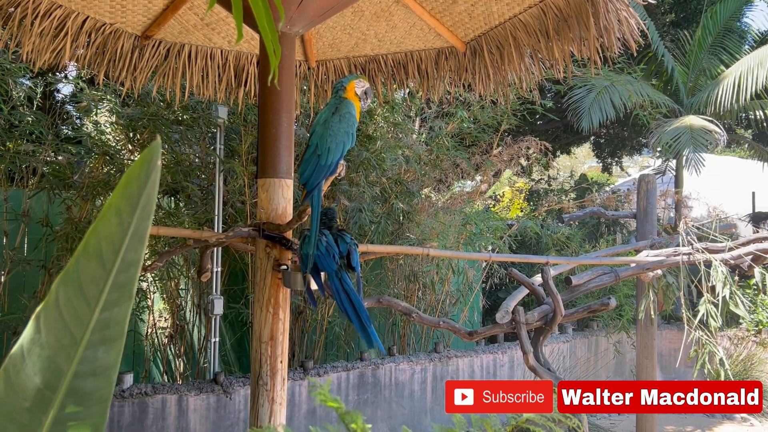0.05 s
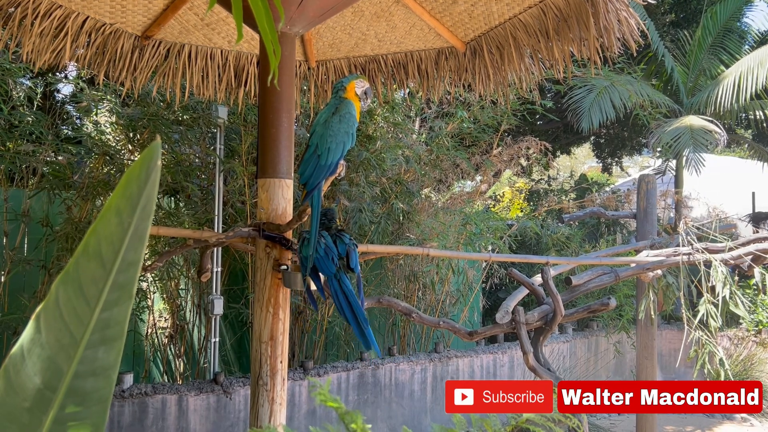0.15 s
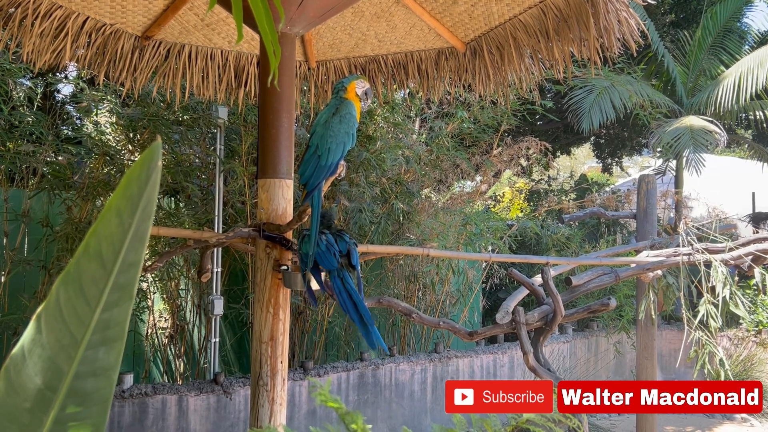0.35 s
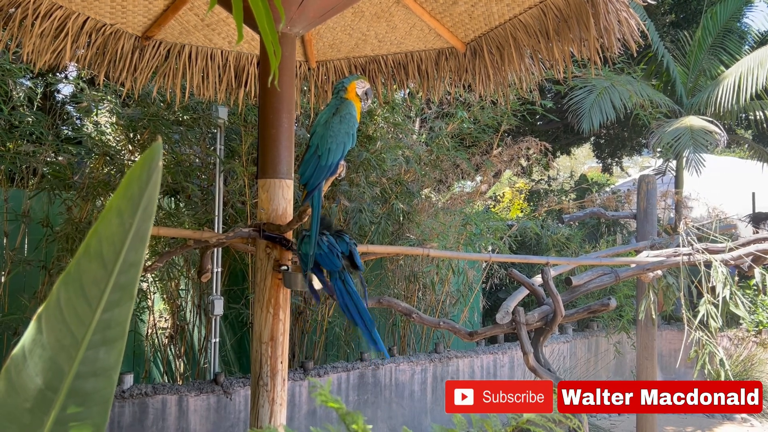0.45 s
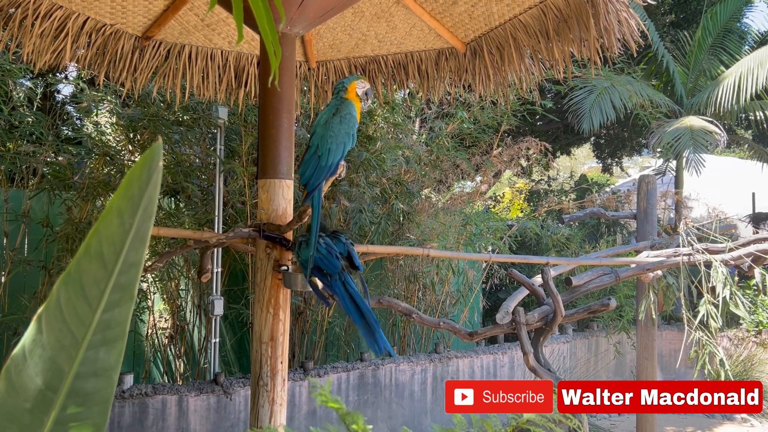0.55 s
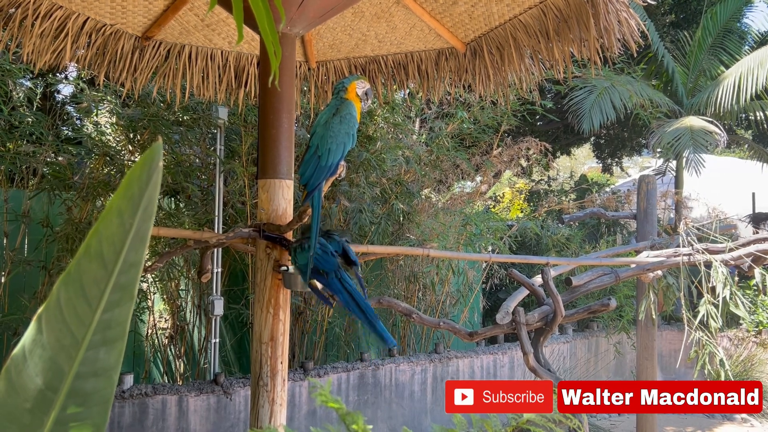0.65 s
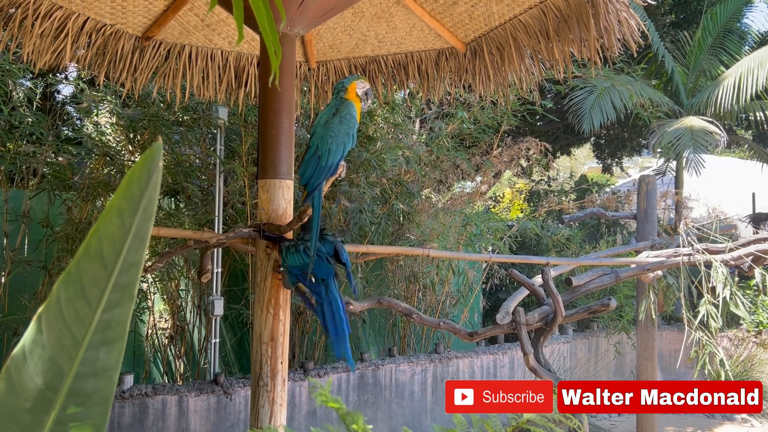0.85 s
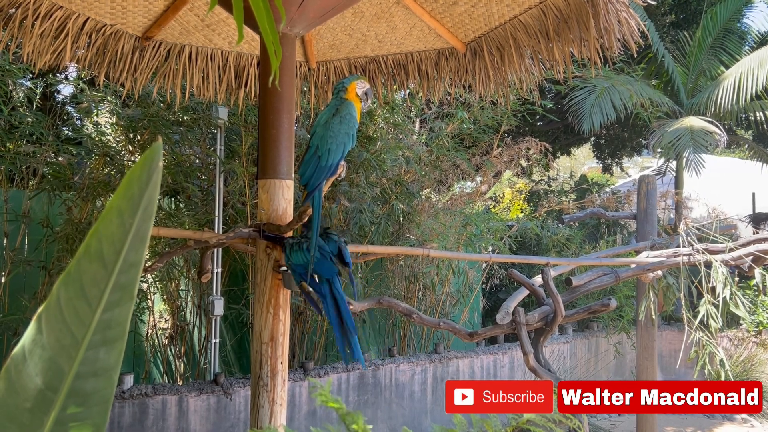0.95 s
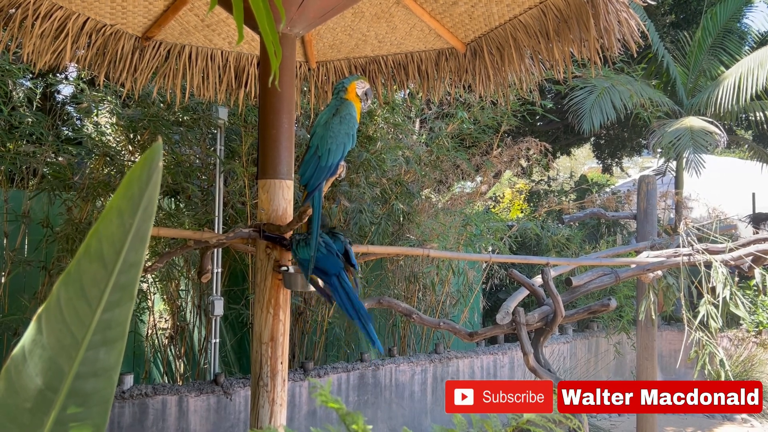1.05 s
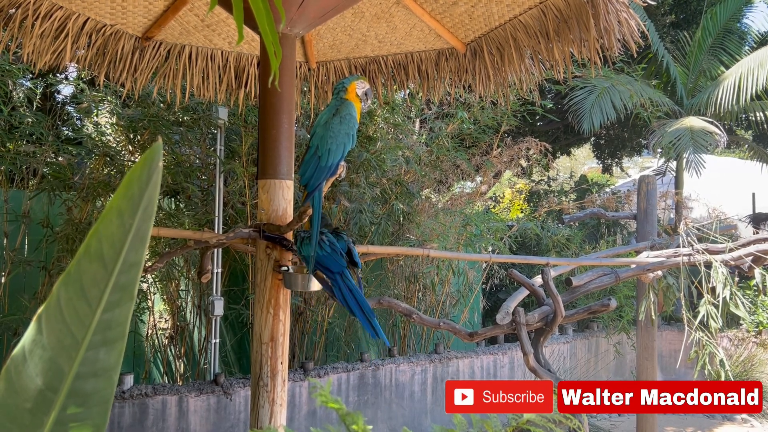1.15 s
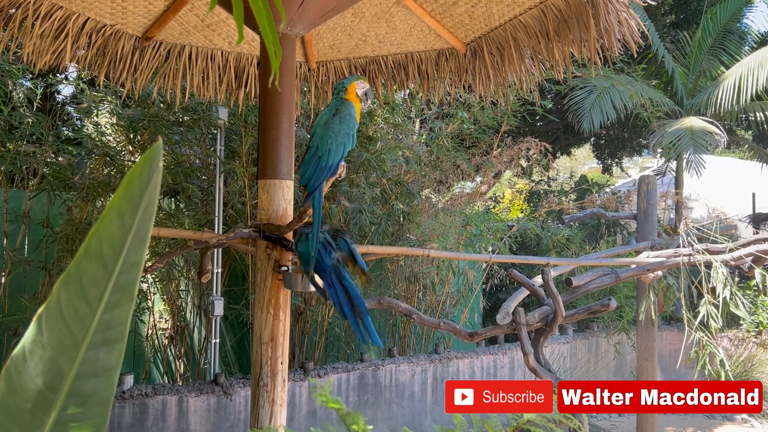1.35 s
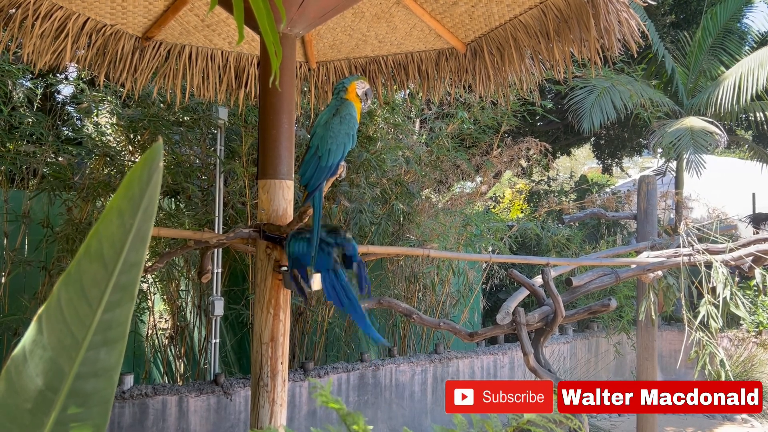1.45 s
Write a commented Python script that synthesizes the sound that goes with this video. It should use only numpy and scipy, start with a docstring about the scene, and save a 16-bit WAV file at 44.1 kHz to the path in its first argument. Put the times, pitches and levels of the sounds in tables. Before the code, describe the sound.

A large parrot gives two harsh calls close by, first a squealing scream that falls away, then a hoarse rasp ending on a nasal tone. Behind it are soft outdoor air and a very faint, distant twitter.

```python
"""A macaw squawks twice, close by, under a thatched shelter in a garden.
The first call leaps up in a squeal, bursts into a scream and falls away; the second is a rattling rasp
that clears to a nasal tone. Its voice box makes pulses that ring in the throat and beak, and the voice
slips some forty times a second, which makes the rasp. The shelter and the garden echo, a small bird
twitters far off over a quiet outdoor wash, and the microphone adds grit to the loudest peaks."""
import sys
import numpy as np
from scipy import signal
from scipy.fft import rfft, irfft
from scipy.io import wavfile
from scipy.ndimage import uniform_filter1d, map_coordinates

SR = 44100
rng = np.random.default_rng(int(sys.argv[2]) if len(sys.argv) > 2 else 0)


def to_wav(sig):
    """Store sig (one row per channel, or 1-D mono) as 16-bit WAV at the path in sys.argv[1].

    Samples outside -1..1 are clipped; the rate is SR.
    """
    pcm = np.clip(np.atleast_2d(sig), -1, 1) * 32767
    pcm = np.round(pcm).astype(np.int16)
    wavfile.write(sys.argv[1], SR, pcm.T)  # frames by channels


N = 66150  # 1.5 seconds

# tone colour of the outdoor wash (frequency [Hz], relative level [dB])
GARDEN_COLOUR = [(15, -20), (25, 15), (69, -13), (99, -9), (246, -15.5), (281, -20), (349, -12), (399, -7),
                 (482, -11), (782, -13), (945, -11.5), (1240, -12.5), (1490, -12), (1620, 0.5),
                 (2120, -9.5), (2560, -5.5), (3090, -10), (4870, -20), (5880, -7), (7100, -21.5),
                 (15500, -28)]
# the small bird's runs of notes (time [s], level [dB], notes [count])
TWITTER_RUNS = [(.598, -46.5, 4), (1.302, -48.5, 5)]
# how long the garden echoes (frequency [Hz], time to fade by 60 dB [s])
ECHO_FADE = [(300, 2.3), (1800, 0.51), (4000, 1.14), (10000, 0.49)]
# how high the squeal and the two squawks are (time [s], pitch [Hz])
SQUEAL_MELODY = [(.18, 655), (.196, 668.6), (.203, 880), (.212, 988), (.224, 1060), (.227, 1256),
                 (.236, 1226), (.249, 1336), (.253, 1675), (.263, 1696), (.27, 1433), (.28, 1320)]
FIRST_MELODY = [(.277, 501.4), (.285, 467), (.305, 514.2), (.315, 477.8), (.326, 497.9), (.338, 475.2),
                (.347, 515.1), (.374, 452.5), (.387, 473.6), (.41, 411.9), (.432, 482.6), (.47, 462.4),
                (.5, 476), (.528, 494.2), (.563, 496.7), (.58, 418), (.592, 362.8), (.615, 339)]
SECOND_MELODY = [(.67, 412.9), (.76, 416.8), (.79, 433.5), (.84, 464.2), (.915, 463.4), (.965, 429.7),
                 (.985, 430), (1.005, 449.8), (1.03, 446.7), (1.07, 438.8), (1.085, 414), (1.096, 367.5),
                 (1.118, 331.4)]
# how loud they are (time [s], level [dB])
SQUEAL_LOUDNESS = [(.178, -49.5), (.19, -29), (.196, -29), (.215, -16.5), (.228, -20), (.252, -16),
                   (.266, -18.5), (.276, -16)]
FIRST_LOUDNESS = [(.277, -12.5), (.308, -10.5), (0.371, -11.5), (0.412, -14), (0.437, -21.5), (.47, -19),
                  (.53, -19.5), (.56, -18), (0.581, -21.5), (0.593, -24.5), (0.61, -32), (0.622, -55)]
SECOND_LOUDNESS = [(.62, -42.5), (.668, -40), (0.672, -30.5), (.681, -29.5), (.685, -24), (.72, -20.5),
                   (.79, -21.5), (.84, -19.5), (.91, -17.5), (.98, -20), (1.03, -18), (1.092, -19.5),
                   (1.112, -28.5), (1.124, -52)]
# how hoarse the squawks are between slips (time [s], roughness [0-1])
FIRST_ROUGHNESS = [(.28, 0.3), (.315, 0.25), (.35, 0.38), (.41, 0.53), (.435, 0.14), (.5, 0.21), (.55, 0),
                   (.58, 0.16), (.61, 0.54)]
SECOND_ROUGHNESS = [(.675, 0.5), (.69, 0.77), (.78, 0.657), (.84, 0.31), (.92, 0.29), (.96, 0.43),
                    (1.006, 0.12), (1.03, 0.039), (1.085, .035), (1.105, 0.56)]
# slips of the voice; a negative dip is louder (time [s], strength [0-1], dip [dB], pitch lift [share])
VOICE_SLIPS = [(0.3, 1, 8, 0.049), (.327, 1, 1, 0.036), (0.381, .6, 0, 0.0458), (0.397, 0.9, -3, 0.029),
               (0.453, 0.68, -2.5, 0.1031), (.483, 0.92, 2.5, 0.095), (0.493, 0.8, -3, 0.13),
               (.514, 1, -3, 0.0808), (0.539, 0.32, -5.5, 0.1058), (0.688, 0.3, 0, 0.03),
               (.711, 0.4, 3, 0.055), (0.729, 0.4, 6.5, 0.051), (0.754, 0.3, 3.5, 0.03633),
               (.779, 0.5, 3, .04), (0.808, .8, 5, 0.044), (.832, 1, 7, 0.046), (.856, 1, 1, 0.079),
               (0.878, 0.92, 6.5, 0.0496), (0.9, 1, 4, 0.04), (.917, 0.9, 3, 0.027), (0.936, 1, 3.5, 0.049),
               (0.955, 0.9, -1.5, 0.013), (0.974, 0.76, 1.5, 0.02), (.998, 0.3, -1.5, 0.0086),
               (1.015, 0.46, -1.5, 0.056)]
# tone colours of the throat and beak, in the order heard (frequency [Hz], relative level [dB])
SQUEAL_COLOUR = [(290, -100), (500, -44.5), (976, -13), (1160, -9.5), (2500, -2), (2840, -10),
                 (3880, -13.5), (4540, -21), (6390, -31), (15000, -75)]
SCREAM_COLOUR = [(200, -47.5), (330, -53), (450, -17.5), (680, -23.5), (950, -12.5), (1400, -6), (1950, 2),
                 (2450, -5), (2950, 2.5), (3450, -12), (3950, -5.5), (4700, -20.5), (6500, -22),
                 (9000, -28), (15500, -52)]
CRY_COLOUR = [(200, -67), (330, -23), (470, -25.5), (700, -30.5), (960, -12), (1450, -9), (2080, 0),
              (2550, -16.5), (2950, -5.5), (3230, -21), (3480, -5.5), (3950, -22.5), (4500, -13.5),
              (5500, -21), (6000, -34.5), (7000, -32), (8700, -38), (11000, -51.5), (15500, -65)]
RASP_COLOUR = [(200, -50), (330, -40), (450, -25), (690, -21.5), (900, -9), (1350, 2), (1880, 2.5),
               (2350, -2), (2560, -17.5), (2800, 1), (3100, -3), (3350, -25.5), (3750, -6), (4150, -24.5),
               (4650, -10), (5600, -20.5), (6000, -39), (6500, -25.5), (7700, -40.5), (10500, -49.5),
               (15500, -62)]
NASAL_COLOUR = [(200, -61), (330, -29.5), (440, -25.5), (680, -32.5), (885, -14.5), (1330, -8), (1770, 0.5),
                (2210, 1), (2650, -2), (3100, -4), (3540, -18), (4400, -21.5), (5300, -26), (6600, -39),
                (8000, -38.5), (10000, -54.5), (12000, -64), (15500, -56)]
# where the hollows of the throat and beak ring (frequency [Hz], width [Hz])
THROAT_RINGS = [(1400, 204), (2000, 670), (2850, 350), (4600, 230)]
# brief whistles of the throat (time [s], pitch [Hz], level [dB], half length [s])
THROAT_PEEPS = [(.273, 2924, -9, 0.0031), (.426, 1412, -13.5, 0.0052), (.493, 2224, -12, 0.0044),
                (.539, 2310, -24, 0.0036), (.607, 1337, -26.5, 0.01), (1.11, 1364, -29.5, 0.0095)]


def amp(db):
    """Turn decibels into a number to multiply by."""
    return 10 ** (np.asarray(db) / 20)


def unit(x):
    """Scale a sound to an average (rms) level of 1."""
    return x / np.sqrt(np.mean(x ** 2) + 1e-20)


def even(x, size=220):
    """Hold a sound's level near 1 from moment to moment."""
    power = uniform_filter1d(uniform_filter1d(x * x, size), size)
    return x / np.sqrt(np.abs(power) + 1e-14)


def along(points, hz):
    """Read between (frequency, value) points, with octaves evenly spaced."""
    known_hz, values = np.transpose(points)
    return np.interp(np.log(hz + 1), np.log(known_hz + 1), values)


def curve(rows):
    """Join (time, value) points with straight lines."""
    return np.interp(np.arange(N) / SR, *np.transpose(rows))


def ramp(at_s, length_s):
    """Rise from 0 to 1 around a moment."""
    return np.clip((np.arange(N) / SR - at_s) / length_s + .5, 0, 1)


def envelope(rows, edge_s=0.0044):
    """Loudness over time, silent beyond both ends."""
    return amp(curve(rows)) * ramp(rows[0][0], edge_s) * (1 - ramp(rows[-1][0], edge_s))


def wobble(per_s):
    """A smooth curve through per_s random values a second."""
    return map_coordinates(rng.standard_normal(N // 20), [np.arange(N) * per_s / SR])


def filtered(x, response):
    """Multiply each frequency in a sound by response(hz)."""
    return irfft(rfft(x, 2 * N) * response(np.fft.rfftfreq(2 * N, 1 / SR)))[:N]


def lows(x, edge_hz, steepness):
    """Keep the part of a sound below a frequency."""
    return filtered(x, lambda hz: 1 / (1 + (hz / edge_hz) ** steepness))


def coloured(x, colour):
    """Give a sound a tone colour."""
    gains = amp(along(colour, np.fft.rfftfreq(2 * N, 1 / SR)))
    cepstrum = irfft(np.log(gains))
    # fold it so that ringing follows a pulse and never comes before it
    cepstrum[1:N] *= 2
    cepstrum[N + 1:] = 0
    return filtered(x, lambda hz: np.exp(rfft(cepstrum)))


def garden(level_db=-55, low_cut_hz=42):
    """A quiet, steady outdoor wash."""
    noise = coloured(rng.standard_normal(N), GARDEN_COLOUR)
    wash = filtered(noise, lambda hz: hz ** 2 / (hz ** 2 + low_cut_hz ** 2))
    return amp(level_db) * unit(wash)


def small_bird(pitch_hz=5570, fall_hz_per_s=70000, gap_s=.0178, half_length_s=.002):
    """Quick runs of tiny falling notes, each with a weaker, lower afternote."""
    out = np.zeros(N)
    for start_s, db, count in TWITTER_RUNS:
        for k in range(count):
            t = np.arange(N) / SR - start_s - k * gap_s
            note = np.exp(-(t / half_length_s) ** 2)
            afternote = amp(-7) * np.exp(-((t - .0055) / half_length_s) ** 2)
            whistle = np.sin(2 * np.pi * t * (pitch_hz - fall_hz_per_s * t / 2))
            out += amp(db) * (note + afternote) * whistle
    return out


def echo(x, bounces=8, level_db=-24):
    """A few weak bounces off the shelter, then the long faint tail of the garden."""
    hz, t, noise = signal.stft(rng.standard_normal(SR), SR, nperseg=256)
    fade = amp(-60 * t / along(ECHO_FADE, hz)[:, None])
    tail = signal.istft(noise * fade, SR, nperseg=256)[1]
    delays = (rng.uniform(.006, .026, bounces) * SR).astype(int)
    shelter = np.bincount(delays, rng.choice([-1, 1], bounces), len(tail)) / np.sqrt(bounces)
    return signal.fftconvolve(x, amp(level_db) * (shelter + tail / np.linalg.norm(tail)))[:N]


def peeps():
    """The throat rings briefly at breaks of the voice and as it closes."""
    t = np.arange(N) / SR
    return sum(amp(db) * np.exp(-((t - s) / half_s) ** 2) * np.sin(2 * np.pi * hz * (t - s))
               for s, hz, db, half_s in THROAT_PEEPS)


def ringing(x):
    """The hollows of the throat and beak hold back their own frequencies, so each pulse rings on."""
    def hold_back(hz):
        rings = [centre ** 2 - hz ** 2 + 1j * hz * width for centre, width in THROAT_RINGS]
        return np.prod(np.conj(rings) / rings, axis=0)
    return filtered(x, hold_back)


def voice_box(pitch, rough, jitter_s=.00013, scatter_db=6, hiss=1.96, reach=8):
    """One pulse per cycle; roughness scatters their times and sizes and adds a puff of air to each."""
    cycles = np.cumsum(pitch) / SR
    air = unit(rng.standard_normal(N) * (1 + np.cos(2 * np.pi * cycles)))
    puffs = lows(air, edge_hz=2720, steepness=5)
    at = np.interp(np.arange(1, int(cycles[-1])), cycles, np.arange(N))
    scatter = rough[at.astype(int)]
    time_slop, size_slop = rng.standard_normal((N // 10, 2))[:len(at)].T * scatter
    at = at + jitter_s * SR * time_slop * np.sqrt(scatter)
    # a pulse falls between samples, so spread it over its neighbours
    nearby = at.astype(int)[:, None] + np.arange(1 - reach, reach + 1)
    offset = nearby - at[:, None]
    shapes = np.sinc(offset) * np.cos(np.pi * offset / (2 * reach)) ** 2
    sizes = amp(scatter_db * size_slop)[:, None]
    pulses = np.bincount(np.clip(nearby, 0, N - 1).ravel(), (sizes * shapes).ravel(), N)
    return ringing(unit(pulses) + hiss * rough * puffs)


def squeal():
    """The thin, nearly clean start of the first call, leaping up in pitch."""
    rough = curve([(.185, .77), (.203, .086), (.262, .042), (.275, .32)])
    pulses = voice_box(curve(SQUEAL_MELODY), rough)
    return envelope(SQUEAL_LOUDNESS) * even(coloured(pulses, SQUEAL_COLOUR))


def slips(onset_s=.0062, catch_s=.0024, settle_s=.006):
    """The voice catches again faster than it slips; the lifted pitch takes longer to sink back."""
    times, strengths, dips_db, lifts = np.transpose(VOICE_SLIPS)
    since = np.arange(N) / SR - times[:, None]
    quick = np.exp(-(since / np.where(since < 0, onset_s, catch_s)) ** 2)
    slow = np.exp(-(since / np.where(since < 0, onset_s, settle_s)) ** 2)
    return strengths @ quick, dips_db @ quick, lifts @ slow


def squawk(melody, roughness, loudness, early, late, change_s, bass_db, treble_db):
    """Pulses through a throat that changes colour once; each slip lifts, roughens and thins the voice."""
    slip, dip_db, lift = slips()
    rough = np.clip(curve(roughness) + .66 * slip ** 1.11, 0, 1)
    warble = .0251 * rough * wobble(per_s=130)
    pulses = voice_box(curve(melody) * (1 + lift + warble), rough)
    blend = ramp(change_s, length_s=.015)
    voice = even((1 - blend) * even(coloured(pulses, early)) + blend * even(coloured(pulses, late)))
    bass = lows(voice, edge_hz=680, steepness=10)
    treble = voice - lows(voice, edge_hz=3500, steepness=10)
    dulling_db = np.minimum(curve(loudness) + 18.5, 0)  # below -18.5 dB the treble fades faster
    bass_gain = amp(bass_db - 36 * slip)
    treble_gain = amp(treble_db - 4 * slip + dulling_db)
    voice = voice + bass * (bass_gain - 1) + treble * (treble_gain - 1)
    return voice * envelope(loudness) * amp(-dip_db)


def macaw():
    """Two calls: a squeal into a scream and a cry, then a rasp that clears to a nasal tone."""
    first = squawk(FIRST_MELODY, FIRST_ROUGHNESS, FIRST_LOUDNESS, SCREAM_COLOUR, CRY_COLOUR,
                   change_s=.419, bass_db=1.3, treble_db=2.1)
    second = squawk(SECOND_MELODY, SECOND_ROUGHNESS, SECOND_LOUDNESS, RASP_COLOUR, NASAL_COLOUR,
                    change_s=1.012, bass_db=5.5, treble_db=2.5)
    return squeal() + first + second + peeps()


def scene():
    """The two birds in their garden, in one channel."""
    calls = macaw()
    return (calls + echo(calls) + small_bird() + garden())[None]


def record(dry, overload=.68, hardness=5, top_hz=15820):
    """The microphone rounds off loud peaks, adding grit above the bass, and keeps nothing over top_hz."""
    x = dry[0]
    rounded = x / (1 + np.abs(x / overload) ** hardness) ** (1 / hardness)
    grit = rounded - x
    gritty = x + grit - lows(grit, edge_hz=380, steepness=4)
    return filtered(gritty, lambda hz: hz < top_hz)[None]


dry = scene()
out = record(dry)
to_wav(out)
```